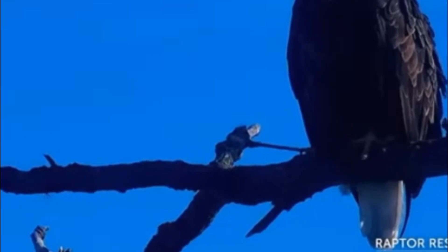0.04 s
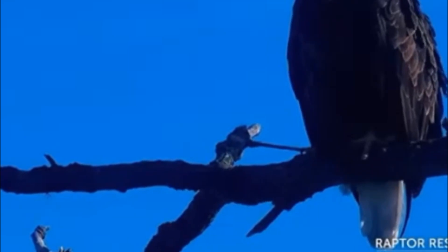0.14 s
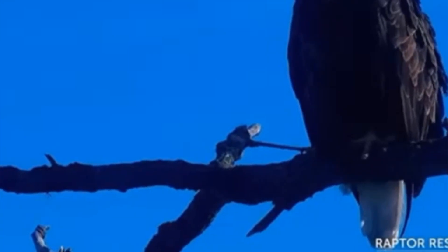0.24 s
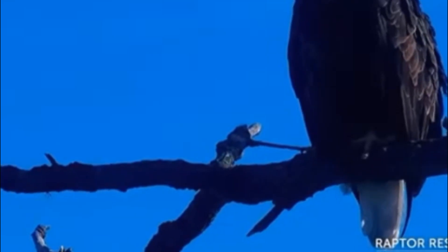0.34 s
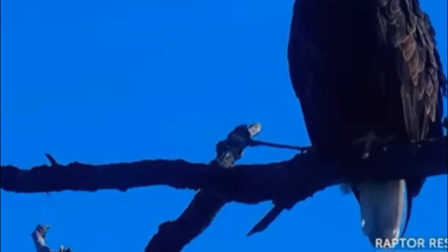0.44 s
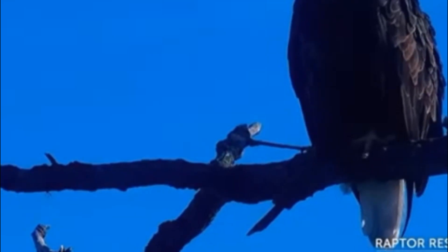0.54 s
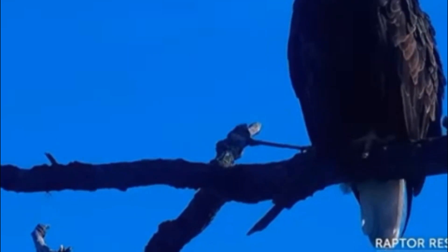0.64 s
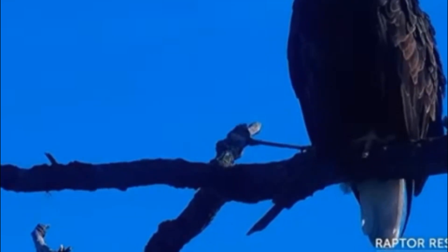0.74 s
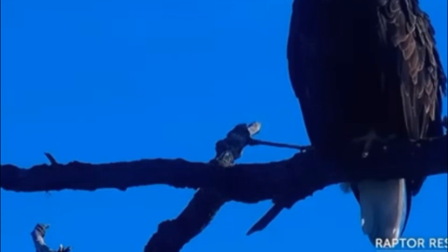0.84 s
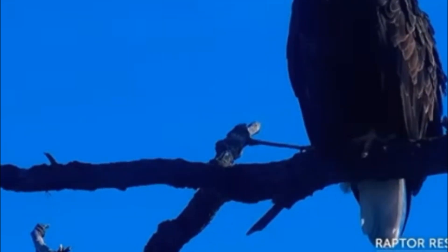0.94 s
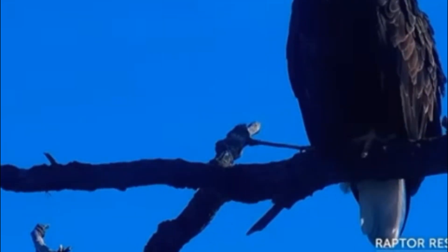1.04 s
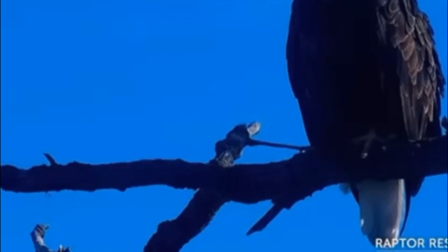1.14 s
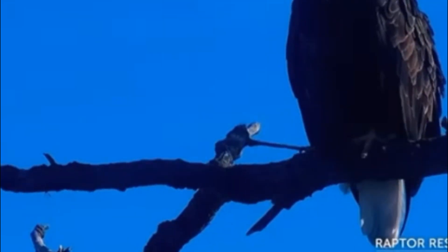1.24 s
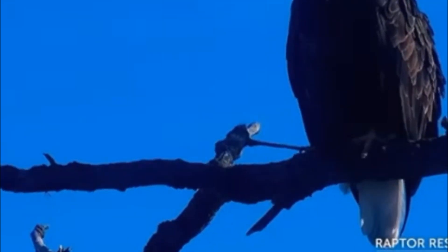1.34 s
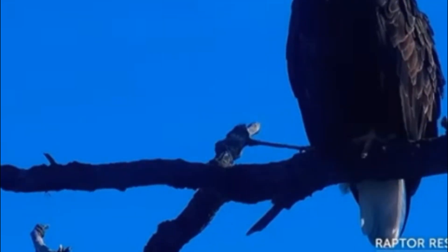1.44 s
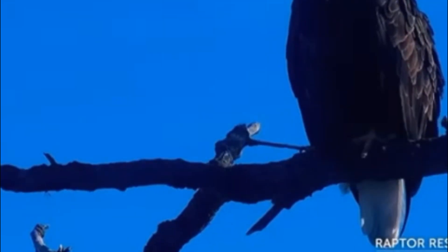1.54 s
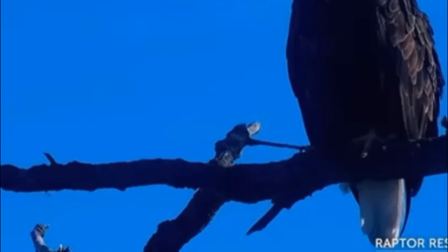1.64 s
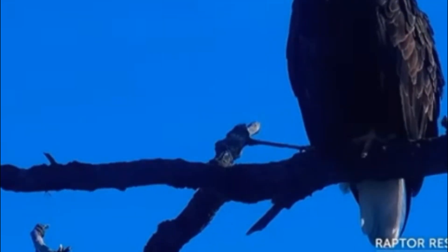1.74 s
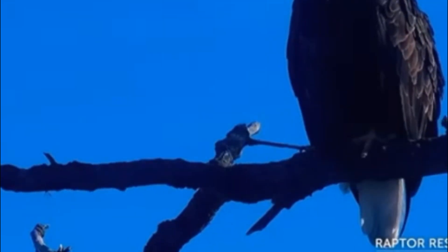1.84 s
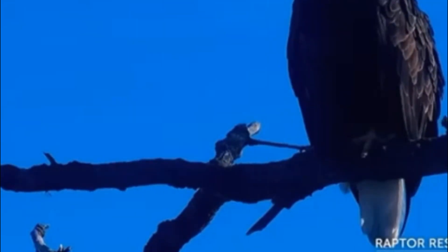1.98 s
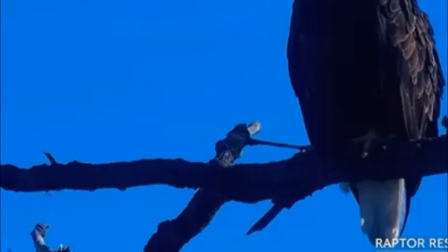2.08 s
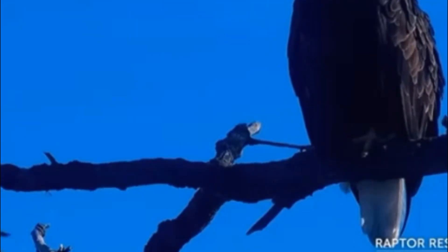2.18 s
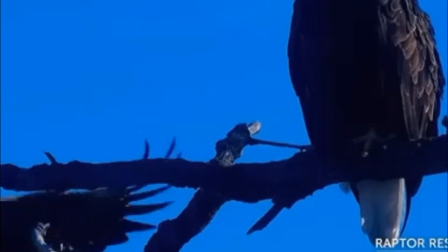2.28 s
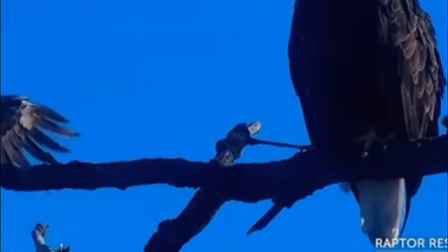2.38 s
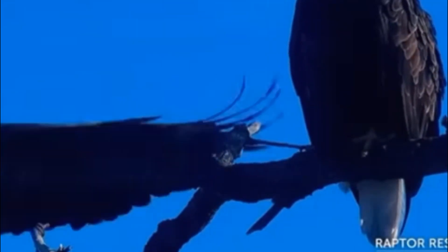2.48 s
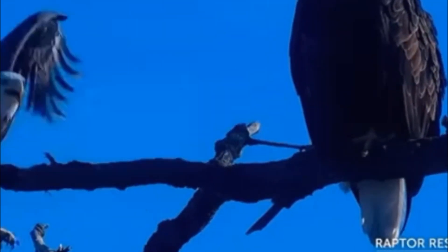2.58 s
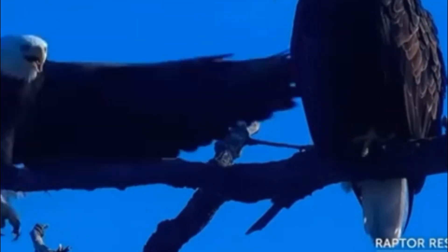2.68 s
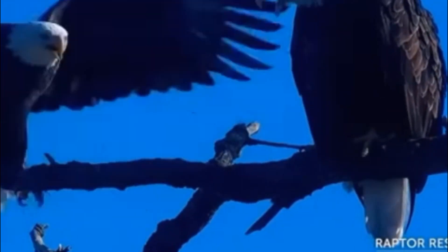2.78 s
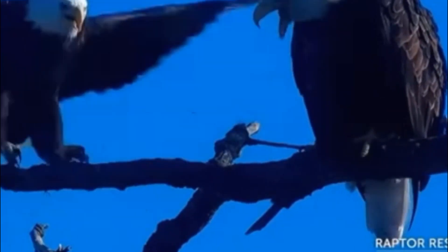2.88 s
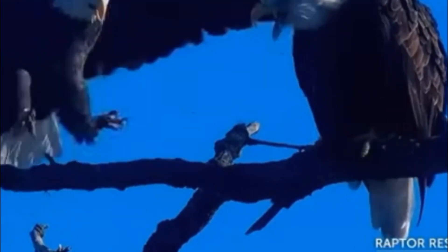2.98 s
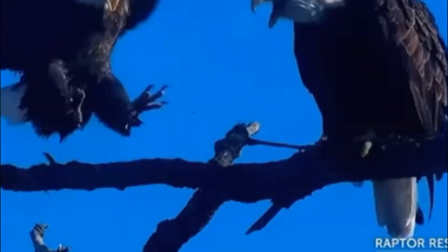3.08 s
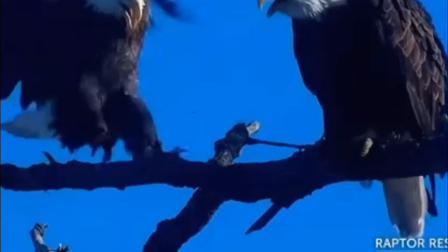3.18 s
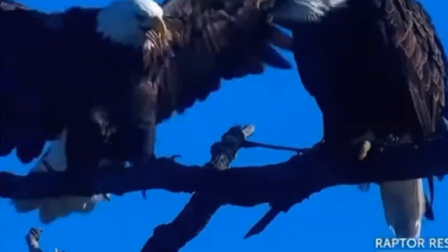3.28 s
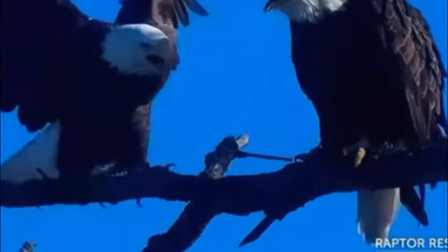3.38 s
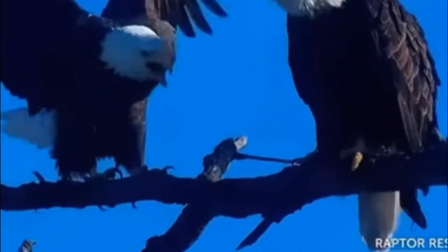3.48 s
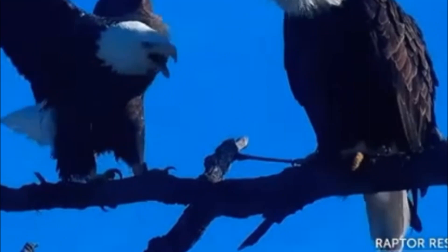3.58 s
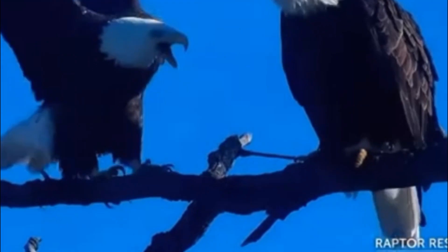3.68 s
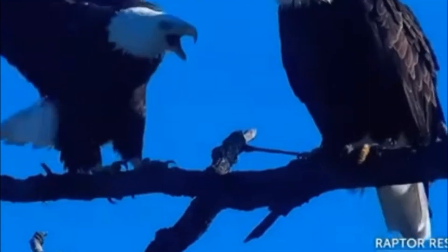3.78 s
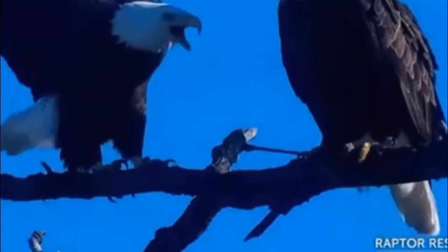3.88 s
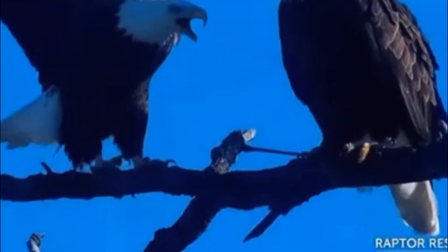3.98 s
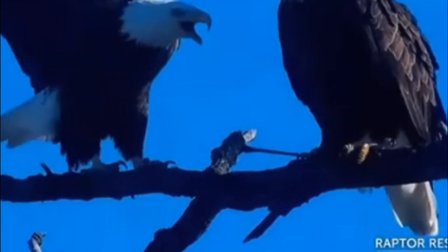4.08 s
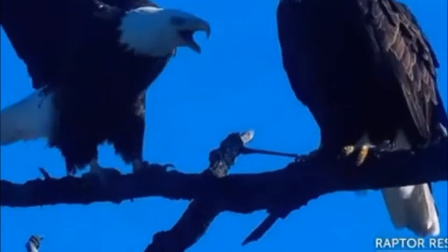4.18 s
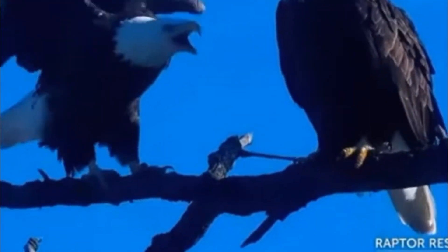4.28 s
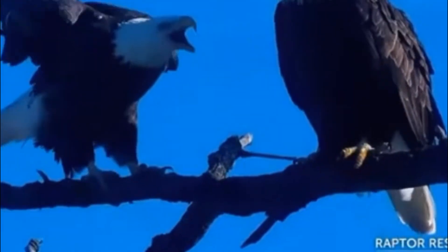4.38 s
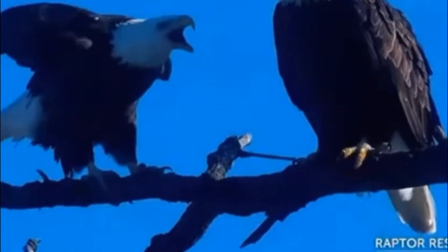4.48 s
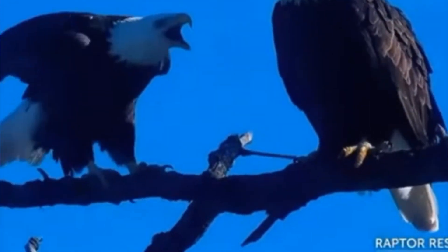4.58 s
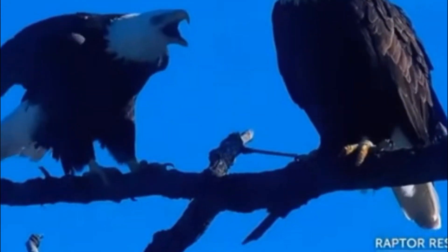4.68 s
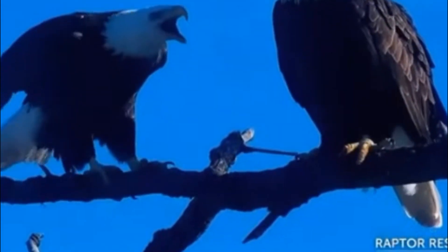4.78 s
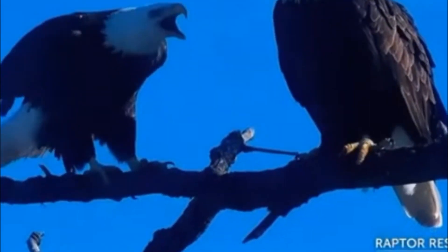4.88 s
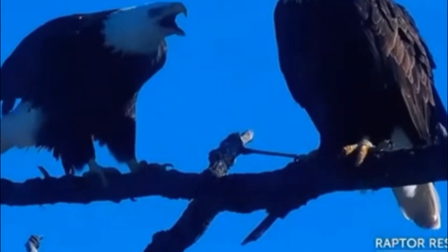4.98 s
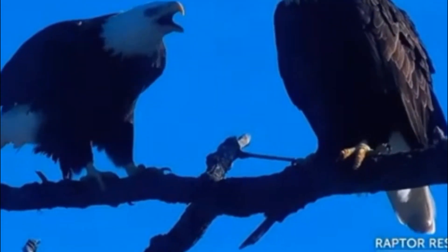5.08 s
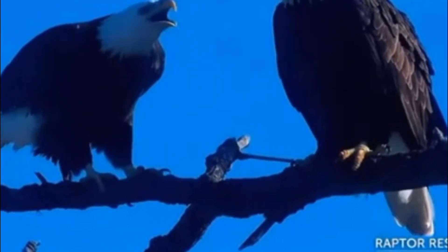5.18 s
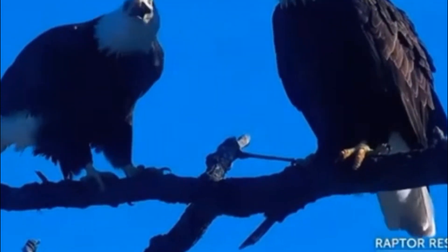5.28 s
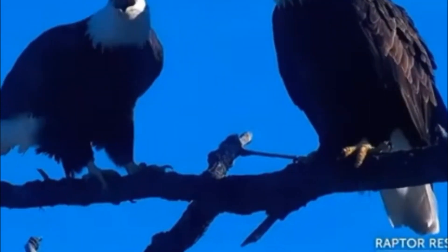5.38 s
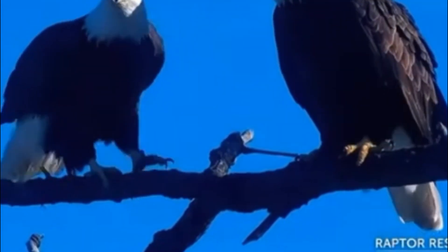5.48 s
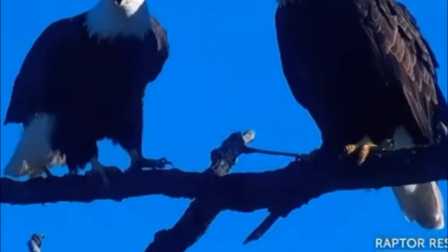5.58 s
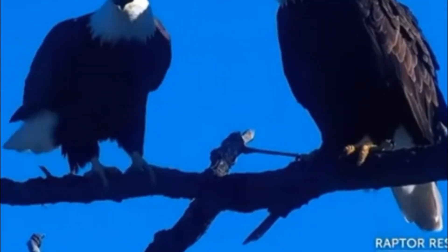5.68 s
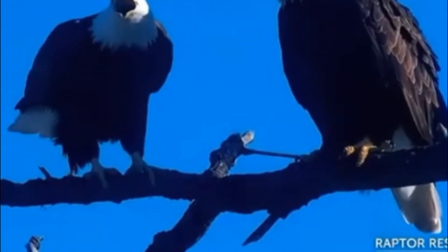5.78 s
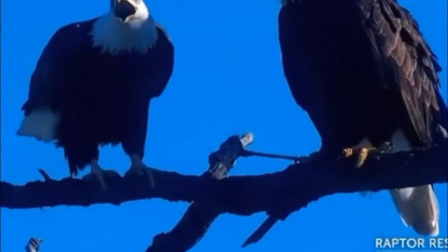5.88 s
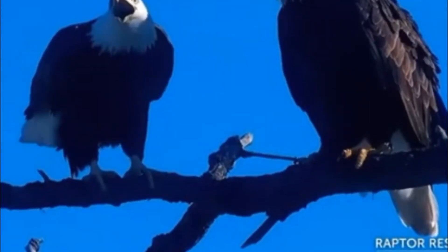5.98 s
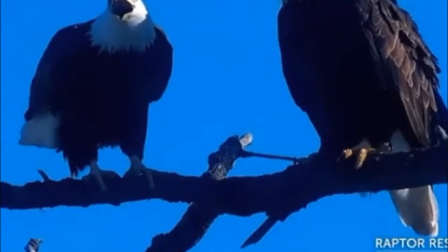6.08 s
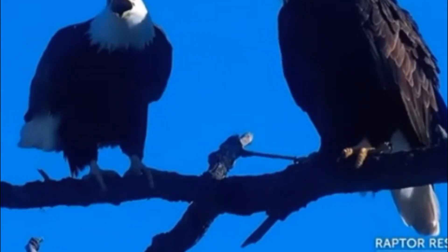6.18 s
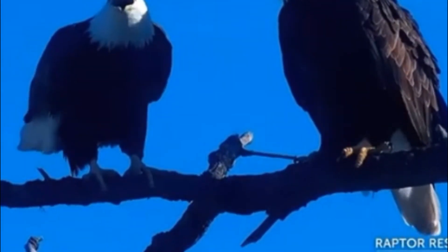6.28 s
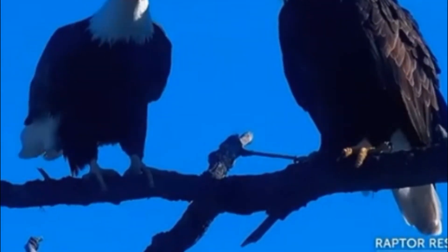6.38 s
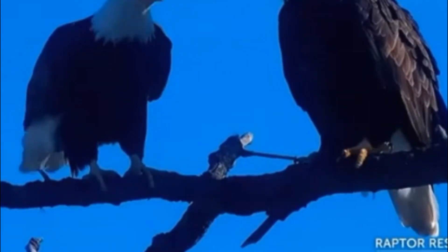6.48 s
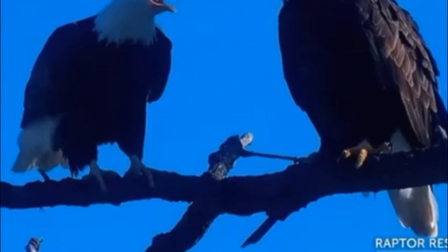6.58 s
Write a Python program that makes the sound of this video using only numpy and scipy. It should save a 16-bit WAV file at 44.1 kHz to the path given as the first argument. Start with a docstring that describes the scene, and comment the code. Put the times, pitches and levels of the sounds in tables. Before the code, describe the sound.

Over faint, steady wind and far-off water, two eagles begin with scattered clicks and brief high chitters. The calling then builds into an excited run of rapid squeaky notes, piping whistles and hoarse, breathy screeches, eases briefly, and returns in another flurry that ends on a few lower notes. The calls are clear, with a light open-air echo.

```python
"""Two eagles chittering

Beaks and throats click; the voices are gliding near-sines with overtones, roughened by unsteady airflow:
double-swelled chitter, squeaks, croaks, whistles and screeches, over rasping breath and bright air.
Trees and slopes return a scattered echo. Distant water and wind rush below, with faint hum and hiss.
The sound drops out once for a moment."""
import sys
import numpy as np
from scipy import signal
from scipy.fft import rfft, irfft, next_fast_len
from scipy.io import wavfile

SR = 44100
rng = np.random.default_rng(int(sys.argv[2]) if len(sys.argv) > 2 else 0)


def master(y):
    """Save y as 16-bit WAV."""
    cut = np.clip(np.atleast_2d(y).T, -1, 1)
    pcm = np.round(cut * 32767)  # scale
    wavfile.write(sys.argv[1], SR, pcm.astype(np.int16))


N = 292824


def from_db(db):
    """Decibels to gain."""
    return 10 ** (np.asarray(db) / 20)


def rms_one(x):
    """Scale to rms 1."""
    return x / np.sqrt(np.mean(x ** 2) + 1e-20)


def filtered(x, order, hz, kind):
    """Butterworth filter."""
    return signal.sosfilt(signal.butter(order, hz, kind, fs=SR, output="sos"), x)


def span(start_s, end_s):
    """Sample times of a stretch."""
    return np.arange(round(start_s * SR), round(end_s * SR)) / SR


def drift(rate_hz):
    """Random wander between knots of spread 1."""
    knots = rng.standard_normal(int(N / SR * rate_hz) + 2)
    return np.interp(np.arange(N) / SR * rate_hz, np.arange(len(knots)), knots)


def coloured(spectrum):
    """Noise of rms 1, shaped by rows of f/Hz, level/dB."""
    hz, db = np.transpose(spectrum)
    size = next_fast_len(N)
    bins_hz = np.maximum(np.arange(size // 2 + 1) * SR / size, 1)
    gain = from_db(np.interp(np.log(bins_hz), np.log(hz), db))
    return rms_one(irfft(rfft(rng.standard_normal(size)) * gain, size)[:N])


def swell(t_ms, rise_ms, fall_ms):
    """Rounded rise and fall, height 1 at time 0."""
    share = np.where(t_ms < 0, -t_ms / rise_ms, t_ms / fall_ms)
    return np.cos(np.pi / 2 * np.clip(share / 1.157, 0, 1)) ** .79


def bursts(rows, rise_db_per_s, floor_db):
    """Gain that climbs to each peak and fades to a floor."""
    t = np.arange(N) / SR
    peaks_db = [db + np.where(t < s, rise_db_per_s, -fade) * (t - s) for s, db, fade in rows]
    return from_db(np.maximum(np.max(peaks_db, axis=0), floor_db))


def short_note(peak_s, rise_ms, fall_ms, start_hz, peak_hz, end_hz, db, octave_db, hoarse_db):
    """Note for voice(): one swell gliding through three pitches."""
    t = span(peak_s - .03, peak_s + .03)
    t_ms = (t - peak_s) * 1000
    pitch_hz = np.interp(t_ms, [-rise_ms, 0, fall_ms], [start_hz, peak_hz, end_hz])
    return t, pitch_hz, from_db(db) * swell(t_ms, rise_ms, fall_ms), octave_db, hoarse_db


def long_note(curve, hoarse_db, edge_s=.002):
    """Note for voice(): follows a curve of pitch, level and octave overtone."""
    s, hz, db, octave_db = np.transpose(curve)
    t = span(s[0], s[-1])
    fade = np.clip(np.minimum(t - s[0], s[-1] - t) / edge_s, 0, 1)
    level = np.sqrt(2) * np.interp(t, s, from_db(db / 2)) ** 2 * fade
    full_effort_octave_db = np.interp(t, s, octave_db - 2 * db) + max(db)
    return t, np.interp(t, s, hz), level, full_effort_octave_db, hoarse_db


def water_and_wind(gust_db=1.63, hum_db=-72.5):
    """Distant rumble and brighter rush, each swaying a little, and a faint hum."""
    # t/s, rumble level/dB, rush level/dB
    levels = [(0.0, -58.5, -60), (0.57, -56.5, -59), (1.29, -59.5, -59.5), (1.64, -57.5, -61),
              (2.44, -60, -59.5), (2.79, -57.5, -60), (3.14, -58, -59), (3.44, -56, -58.5),
              (3.59, -55.5, -55.5), (3.86, -55.5, -56.5), (4.03, -57.5, -55.5), (4.48, -54.5, -57.5),
              (5.1, -55.5, -57), (5.44, -55.5, -58), (6.1, -54.5, -56), (6.31, -60, -55.5),
              (6.64, -60.5, -53.5)]
    # spectra: f/Hz, level/dB
    rumble_spectrum = [(20, -47.5), (60, -61), (100, -27.5), (160, -9.5), (215, 3), (270, 7.5), (350, 5),
                       (450, 2.5), (560, 1), (800, -44.5), (1500, -41.5)]
    rush_spectrum = [(450, -25.5), (650, 3), (800, 1), (1000, 3), (1320, 5.5), (1650, 0), (2100, -6.5),
                     (3200, -14.5), (5000, -22.5), (7000, -27.5), (8500, -52.5), (11000, -53)]
    hum_spectrum = [(850, -41), (960, -7.5), (1010, 0), (1060, -9.5), (1200, -40.5)]
    s, *columns = np.transpose(levels)
    rumble_db, rush_db = [np.interp(np.arange(N) / SR, s, db) for db in columns]
    rumble = from_db(rumble_db + gust_db * drift(6.2)) * coloured(rumble_spectrum)
    hum = from_db(hum_db + 3.3 * drift(1.5)) * coloured(hum_spectrum)
    rush = from_db(rush_db + gust_db * drift(6.3)) * coloured(rush_spectrum)
    return rumble + hum + rush


def clicks(rise_cycles=1.7, crack_db=-10):
    """A snap rings a few cycles in the throat, with a broad crack on top."""
    # beak and throat snaps: t/s, level before the band-pass/dB, f/Hz
    snaps = [(0.377, -46, 4080), (0.7262, -42, 3940), (0.7347, -46, 1710), (1.0016, -51, 2380),
             (1.016, -49, 2120), (1.0394, -51, 4050), (1.0605, -51, 3720), (1.072, -41, 3880),
             (1.516, -43.5, 3960), (1.8463, -47, 3080), (1.8547, -47, 2500), (1.8698, -38.5, 4040),
             (1.883, -32, 4150), (1.9854, -34, 4400), (2.03, -45, 4910), (2.0378, -34.5, 4050),
             (2.1321, -48, 3860), (2.2344, -54, 3850), (2.385, -48.5, 4320), (2.9222, -43, 4480),
             (2.9336, -48, 2060), (2.9434, -60, 1960), (3.027, -43, 1870), (3.2444, -49, 2930),
             (3.5516, -44, 3040), (3.56, -41, 3120), (3.9199, -29.5, 2960), (4.2804, -41.5, 2960),
             (4.4044, -41, 3440), (4.663, -41, 2720), (4.684, -40, 2890), (5.0424, -59, 3770),
             (5.0874, -41, 4280), (5.1364, -55, 4300), (5.1834, -23, 4180), (5.2779, -31, 4160),
             (5.8304, -48, 3160)]
    out = np.zeros(N)
    t = np.arange(300) / SR
    for s, db, hz in snaps:
        age = t * hz / rise_cycles
        envelope = from_db(db) * age * np.exp(1 - age)
        crack = from_db(crack_db) * rng.standard_normal(len(t))
        at = round(s * SR)
        out[at:at + len(t)] += envelope * (np.sin(2 * np.pi * hz * t) + crack)
    return filtered(out, 4, [1800, 6400], "band")


def chitter(plunge_ms=2.5, sweep_rise_ms=4, sweep_fall_ms=4.9, last_fall_ms=4.14, sag=.97):
    """Each note swells, sags and swells again; a strong lead-in sweeps down from above."""
    # first swell: t/s, f/Hz, level/dB, rise/ms; second swell: gap/ms, f/Hz, level/dB;
    # sweep level/dB, relative octave/dB, hoarseness/dB
    notes = [(1.1105, 4120, -42, 2, 9, 4100, -56, -68, -45, -18),
             (1.179, 3740, -36.5, 4.8, 18, 4000, -44, -45, -41, -15),
             (1.2123, 4150, -47, 3.8, 4.5, 4040, -44, -74, -38, -17),
             (1.2816, 3690, -39.5, 5.8, 14, 4040, -54, -50, -49, -14),
             (1.9518, 3904, -24.5, 6.2, 10.6, 4190, -23, -34.5, -37.5, -25.5),
             (2.0458, 3995, -19, 5.5, 11.2, 4120, -20.5, -36.5, -39, -23.5),
             (2.1431, 3920, -27.5, 4.3, 14.8, 3890, -33, -51, -38, -19),
             (2.2607, 3680, -41, 8, 8.9, 3920, -58, -62, -45, -18),
             (3.02, 3730, -38, 3, 6.5, 3930, -58, -57, -29.5, -13),
             (3.122, 3800, -32, 3.5, 5.3, 3650, -36.5, -65, -25.5, -17),
             (3.6782, 3960, -35.5, 4, 8.7, 3850, -50, -62.5, -36, -25.5),
             (4.1475, 4210, -23, 3.7, 18, 4160, -24.5, -38, -48, -16.5),
             (4.244, 4194, -20.5, 7.6, 10.2, 4400, -29, -46, -44, -18.5),
             (4.3364, 4010, -28.5, 6.3, 7.6, 3950, -45, -49, -53.5, -14),
             (5.0071, 3962, -18, 3.1, 10.6, 4350, -33, -70, -40, -27.5),
             (5.1047, 4400, -24, 2.9, 9, 3850, -30.5, -55, -52, -19),
             (5.191, 4050, -21.5, 8, 15, 4214, -19.5, -35, -38, -19),
             (5.294, 3924, -23, 10, 13.8, 4150, -32, -36, -35.5, -21),
             (5.7765, 3160, -30, 5.5, 10.7, 3150, -34.5, -70, -30, -31),
             (5.814, 3800, -40.5, 2.9, 9.3, 3670, -51, -44, -34, -18),
             (5.8764, 3190, -34, 6.1, 12, 3170, -38, -69, -26.5, -34),
             (5.887, 4020, -44, 3.4, 18.5, 3900, -44, -43, -41, -10),
             (5.95, 3950, -24.5, 5.1, 12, 4280, -29, -32, -32, -36.5),
             (6.0596, 4180, -26.5, 4.9, 7.5, 3920, -29, -46, -48, -9),
             (6.1382, 3830, -36, 3.7, 8, 3800, -57, -63, -43, -20)]
    for s, hz, db, rise_ms, gap_ms, next_hz, next_db, sweep_db, octave_db, hoarse_db in notes:
        t = span(s - .024, s + .04)
        t_ms = (t - s) * 1000
        sweep_at_ms = -max(8.8, rise_ms + 1)
        plunge_at_ms = sweep_at_ms - sweep_rise_ms
        fall_ms = .35 * gap_ms
        lead_ratios = [1.8, 1.2, 1.13, 1.04] if sweep_db > db - 25 else [sag] * 4
        knots_ms = [plunge_at_ms - plunge_ms, plunge_at_ms, sweep_at_ms, -rise_ms,
                    0, fall_ms, gap_ms, gap_ms + last_fall_ms]
        knots_hz = [*np.multiply(lead_ratios, hz), hz, sag * hz, next_hz, sag * next_hz]
        level = (from_db(sweep_db - 17) * swell(t_ms - plunge_at_ms, plunge_ms, plunge_ms)
                 + from_db(sweep_db) * swell(t_ms - sweep_at_ms, sweep_rise_ms, sweep_fall_ms)
                 + from_db(db) * swell(t_ms, rise_ms, fall_ms)
                 + from_db(next_db) * swell(t_ms - gap_ms, .34 * gap_ms, last_fall_ms))
        yield t, np.interp(t_ms, knots_ms, knots_hz), level, octave_db, hoarse_db


def voice(notes, waver=.0025, thinning_db_per_octave=-30, grit_db=-12):
    """Notes sound as near-sines whose overtones grow with effort; hoarseness adds noise."""
    # scratch under hoarse swells: f/Hz, level/dB
    grit_spectrum = [(800, -44.5), (1500, 0), (2300, 29), (3300, -4), (5500, -35), (7500, -24),
                     (11000, -46.5)]
    wobble = 1 + waver * drift(300)
    flutter = rms_one(filtered(rng.standard_normal(N), 3, 1200, "low"))   # unsteady airflow
    jitter = rms_one(filtered(rng.standard_normal(N), 3, [150, 900], "band"))   # cycle timing slips
    grit = rms_one(coloured(grit_spectrum) * from_db(12 * drift(500)))
    out = np.zeros(N)
    for t, pitch_hz, level, octave_db, hoarse_db in notes:
        at = np.round(t * SR).astype(int)
        hz = pitch_hz * wobble[at]
        hoarse = from_db(hoarse_db)
        effort = level / level.max()
        phase = 2 * np.pi * np.cumsum(hz) / SR + 1.6 * hoarse * jitter[at]
        # high notes and pure notes keep weaker upper overtones
        thin_db = thinning_db_per_octave * np.maximum(np.log2(pitch_hz / 3000), 0)
        thin_db += .3 * (np.clip(np.median(octave_db), -45, -25) + 30)
        tone = np.sin(phase)
        for k, overtone_db in (2, octave_db), (3, thin_db - 44), (4, thin_db - 52):
            audible = k * hz < SR / 2.5
            tone += audible * effort * from_db(overtone_db) * np.sin(k * phase)
        rough_tone = tone * (1 + hoarse * flutter[at])
        out[at] += level * (rough_tone + hoarse * from_db(grit_db) * grit[at])
    return out


def squeaks():
    """Single brief glides between the notes."""
    # peak t/s, rise/ms, fall/ms, start f/Hz, peak f/Hz, end f/Hz, level/dB
    notes = [(1.317, 1.7, 3.3, 3500, 3920, 3600, -45.5), (1.908, 4.5, 2.6, 5000, 5800, 7440, -61),
             (2.085, 6, 5, 4340, 4850, 4950, -48), (2.1698, 4.2, 4.4, 4030, 3940, 3970, -44),
             (3.128, 4.7, 2.6, 2930, 2990, 2930, -36.5), (3.359, 8.4, 6.4, 4060, 5050, 3820, -40.5),
             (3.457, 4.4, 6.1, 4000, 5200, 3900, -42), (3.535, 4, 27, 6140, 6280, 6040, -45.5),
             (3.6842, 3.9, 17, 3180, 3210, 3520, -49), (3.75, 3.8, 8.7, 3870, 4160, 3800, -41.5),
             (3.8927, 3.8, 6.7, 5170, 4660, 5000, -42.5), (4.1145, 1.2, 1.7, 4060, 4000, 4260, -36.5),
             (4.119, 3.3, 4, 4440, 5400, 6450, -57.5), (4.2976, 2.3, 4.1, 3190, 2930, 3000, -43),
             (4.5725, 4.4, 7.8, 3690, 3790, 3630, -31), (4.5936, 12, 5.7, 3720, 3770, 4070, -38),
             (4.617, 4.5, 2.1, 4560, 4270, 4690, -40), (4.602, 4.5, 4.7, 4430, 6020, 3800, -40),
             (4.638, 4.1, 9, 7300, 6720, 7040, -42.5), (4.6424, 2.3, 2.1, 4800, 4530, 4540, -39.5),
             (4.6604, 1.4, 3.5, 3900, 3600, 4050, -38), (4.6654, 6.3, 4.6, 2700, 2780, 2650, -38),
             (4.9885, 5.5, 11.4, 3340, 4055, 3970, -29), (5.045, 4.7, 2.8, 3730, 4550, 6300, -34.5),
             (5.081, 2, 5.2, 7500, 6840, 6100, -44.5), (5.088, 5.9, 2.4, 6340, 4700, 4800, -35.5),
             (5.096, 2.5, 1.5, 4930, 5030, 5050, -28.5), (5.096, 12.5, 2.5, 4440, 4280, 4600, -34),
             (5.213, 4.6, 5.5, 3440, 3420, 3130, -47), (5.119, 4.4, 5.5, 3530, 4200, 3620, -36),
             (5.7998, 3.3, 6.1, 5120, 4780, 4400, -44), (6.026, 2.7, 3, 5830, 4660, 3540, -34),
             (5.305, 5.5, 5, 3260, 3400, 3250, -42), (5.866, 6, 4, 7200, 6400, 4250, -55.5),
             (5.7539, 15, 8.3, 2780, 2900, 2930, -50), (5.763, 7.9, 5, 3580, 4830, 3750, -38.5),
             (5.7887, 8.5, 4.7, 4770, 4740, 4960, -41), (5.918, 8, 4.3, 3900, 3050, 2760, -47),
             (5.9308, 8, 2.7, 3680, 4540, 4650, -30), (5.939, 7, 2, 4760, 4810, 4480, -28),
             (5.948, 5, 3.6, 4690, 4894, 4850, -25.5), (5.9624, 5.8, 3.5, 4850, 4830, 4780, -30),
             (5.9699, 3.4, 3.2, 4950, 5180, 5600, -34.5), (6.0364, 2.4, 4.6, 5700, 4900, 5100, -33),
             (6.0411, 2.8, 8.8, 6350, 6080, 5940, -34.5), (6.187, 5, 15, 4360, 3720, 3600, -41)]
    return [short_note(*note, octave_db=-36, hoarse_db=-20.5) for note in notes]


def rasp(slips_per_s=500, ring_cycles=11, breath_db=-4):
    """The voice breaks into tiny squeaks of scattered pitch over turbulent breath."""
    # hoarse breaths: peak t/s, level/dB, fade/(dB/s)
    breaths = [(1.86, -58.5, 33), (2.93, -66.5, 29), (3.35, -54, 20), (3.44, -47.5, 250),
               (3.55, -45, 199.5), (3.75, -49.5, 201.5), (3.9, -43, 449.5), (4.13, -46, 278),
               (4.27, -42, 177), (4.52, -57, 69), (4.63, -54, 100), (4.69, -46, 900), (5.0, -62, 68),
               (5.2, -70, 79), (5.1, -60, 200), (5.36, -60, 160), (5.85, -56.5, 79), (5.96, -48.5, 110.5),
               (6.18, -72, 46.5)]
    # squeaks and breath: f/Hz, level/dB
    spectrum = [(500, -64.5), (900, -13), (1600, 10), (2500, 10.5), (4000, 8), (6500, -9), (8000, -37),
                (11000, -47), (15500, -26.5)]
    hz, db = np.transpose(spectrum)
    pitches_hz = np.geomspace(1500, 7500, 16)
    slips = (rng.random(N) < slips_per_s / SR) * rng.standard_normal(N) + 1e-18
    pitch_index = rng.integers(0, len(pitches_hz), N)
    grains = np.zeros(N)
    for k, pitch_hz in enumerate(pitches_hz):
        radius = from_db(-60 * pitch_hz / ring_cycles / SR)
        poles = [1, -2 * radius * np.cos(2 * np.pi * pitch_hz / SR), radius ** 2]
        ring = signal.lfilter([1], poles, slips * (pitch_index == k))
        rounded = signal.lfilter([1, 0, -1], poles, ring)   # second pass softens the onset
        gain = from_db(np.interp(np.log(pitch_hz), np.log(hz), db)) * np.sqrt(pitch_hz)
        grains += gain * rms_one(rounded)
    breath = coloured(spectrum) * from_db(3 * drift(300))
    texture = rms_one(rms_one(grains) + from_db(breath_db) * rms_one(breath))
    return bursts(breaths, rise_db_per_s=329.5, floor_db=-74.5) * texture


def croaks(start_ratio=.91):
    """Low notes with a strong octave slide up to their pitch."""
    # peak t/s, rise/ms, fall/ms, f/Hz, level/dB
    notes = [(1.8817, 1.8, 2.8, 2490, -42.5), (3.3479, 8, 2.4, 1975, -30), (3.4692, 2.6, 6, 1990, -47.5),
             (3.5689, 5, 2.7, 2100, -47), (3.756, 8.6, 5.7, 1342, -45.5), (3.758, 9.5, 1.3, 2105, -38.5),
             (4.13, 7.6, 8.2, 1309, -42.5), (4.2997, 4.5, 1.7, 1800, -43), (4.5241, 4.7, 4.9, 1825, -30.5),
             (4.626, 7.8, 9.1, 1872, -41), (4.687, 9.5, 5.5, 1750, -44.5), (5.0877, 8, 2.8, 2080, -41.5),
             (6.0119, 12, 5.6, 1983, -38), (6.018, 5.9, 5.4, 1970, -35), (6.193, 5.7, 5.2, 2416, -37),
             (6.4364, 7.3, 9.1, 2200, -48), (6.507, 5.9, 5, 1550, -44.5)]
    for s, rise_ms, fall_ms, hz, db in notes:
        yield short_note(s, rise_ms, fall_ms, start_ratio * hz, hz, hz, db,
                         octave_db=-9.5, hoarse_db=-23.5)


def bright_air():
    """Air rushes out at the height of the calls: grainy hiss far above the voice."""
    # peak t/s, level/dB, fade/(dB/s)
    puffs = [(3.325, -72.5, 302.5), (3.54, -70, 450), (3.9, -70.5, 600), (4.27, -77, 480), (4.62, -78, 300),
             (5.945, -73, 61), (6.0, -75.5, 60), (6.05, -70, 700)]
    hiss = filtered(rng.standard_normal(N), 4, 8000, "high")
    grainy = rms_one(hiss * from_db(3 * drift(360)))
    return bursts(puffs, rise_db_per_s=449, floor_db=-110) * grainy


def whistles():
    """Longer, nearly pure gliding notes."""
    # one curve per whistle: t/s, f/Hz, rms level/dB, octave rms level/dB
    curves = [
        [(3.369, 3020, -48, -74.5), (3.375, 2950, -20.5, -49.5), (3.381, 3060, -25, -53),
         (3.385, 3084, -36, -65.5), (3.391, 3080, -19, -52.5), (3.397, 3066, -27, -50.5),
         (3.405, 3010, -53.5, -60.5), (3.409, 3063, -45, -77), (3.413, 3160, -31.5, -62.5),
         (3.419, 3110, -32.5, -65.5), (3.431, 2930, -54.5, -89.5), (3.439, 3040, -46.5, -68.5),
         (3.455, 3100, -49.5, -84)],
        [(3.741, 2560, -47, -76.5), (3.757, 2900, -28.5, -67.5), (3.765, 2932, -23, -59),
         (3.779, 3020, -18.5, -47), (3.789, 3092, -31.5, -58.5), (3.805, 3084, -26.5, -46.5),
         (3.815, 2976, -28, -62.5), (3.827, 2955, -22.5, -52.5), (3.837, 2865, -26, -78),
         (3.843, 2900, -42, -64)],
        [(3.497, 3110, -64.5, -69.5), (3.503, 3010, -50, -58), (3.513, 2960, -43.5, -81),
         (3.527, 3050, -48, -69.5), (3.533, 2960, -65, -60.5), (3.543, 3140, -43, -67), (3.563, 3085, -51, -72),
         (3.571, 3130, -51, -94), (3.573, 3091, -55.5, -85.5)],
        [(3.894, 3170, -40.5, -61), (3.896, 3230, -31.5, -62), (3.902, 3213, -27.5, -47.5),
         (3.908, 3080, -37, -57), (3.914, 3045, -48.5, -76), (3.92, 3025, -42, -70), (3.936, 3100, -42, -75.5),
         (3.94, 3047, -49, -86.5)],
        [(4.124, 2500, -46.5, -86.5), (4.128, 2500, -45, -69), (4.136, 2833, -32, -59), (4.146, 2815, -19, -51),
         (4.164, 3006, -20, -43), (4.17, 3060, -25.5, -52), (4.178, 3172, -44.5, -79)],
        [(4.33, 3460, -53.5, -86), (4.334, 3380, -41, -70.5), (4.34, 3336, -29, -53), (4.346, 3400, -42, -81),
         (4.348, 3300, -45, -99.5), (4.35, 3240, -36, -83), (4.362, 3260, -48, -76)],
        [(4.525, 2745, -34.5, -60), (4.535, 2724, -22, -44), (4.547, 2900, -20.5, -51),
         (4.553, 2980, -21.5, -43.5), (4.56, 3190, -36, -59.5)],
        [(5.968, 2996, -40, -75.5), (5.97, 2960, -39, -84), (5.972, 2970, -25.5, -71),
         (5.978, 3078, -21.5, -55), (5.986, 3017, -28, -59), (5.992, 3004, -38, -77), (5.998, 2950, -22, -57),
         (6.004, 2910, -30.5, -57), (6.015, 2940, -44, -70)],
        [(6.076, 2935, -43, -68), (6.082, 2937, -25.5, -62), (6.088, 2964, -25.5, -52.5),
         (6.104, 2891, -27, -67), (6.116, 2846, -32, -84.5), (6.122, 2871, -37, -83), (6.124, 2868, -40, -97)],
        [(6.189, 2910, -44, -92), (6.197, 2902, -26, -74), (6.205, 2867, -24.5, -70), (6.213, 2817, -30.5, -85),
         (6.221, 2900, -39, -72), (6.226, 2950, -42, -69)],
        [(5.668, 2850, -65, -119), (5.68, 2980, -47.5, -84), (5.702, 3670, -47.5, -60),
         (5.712, 3595, -42.5, -55.5), (5.722, 3520, -64.5, -87.5), (5.73, 3490, -49.5, -57),
         (5.74, 3800, -55, -54), (5.756, 4100, -68, -85)],
        [(6.298, 2256, -44, -65), (6.306, 2288, -28, -44.5), (6.316, 2214, -29, -45), (6.324, 2290, -48, -63)],
        [(6.403, 2140, -58, -88), (6.411, 2040, -40, -62), (6.419, 2070, -34, -45), (6.425, 2093, -33, -56),
         (6.432, 2240, -51, -78)],
    ]
    return [long_note(curve, hoarse_db=-31.5) for curve in curves]


def screeches(snap_s=.0045, from_hz=4100, to_hz=4300, snap_loss_db=1):
    """The voice snaps up, glides high and snaps down."""
    # one curve per screech: t/s, f/Hz, rms level/dB, octave rms level/dB
    curves = [
        [(3.47, 6327, -62, -103), (3.486, 6500, -59, -75), (3.5, 6731, -57, -79), (3.504, 6721, -67, -89),
         (3.516, 6841, -60, -70), (3.524, 6840, -63.5, -108), (3.528, 6600, -51.5, -92),
         (3.533, 6600, -55, -98)],
        [(3.846, 6120, -55, -91.5), (3.852, 6125, -50, -90), (3.868, 6190, -52, -99.5), (3.874, 6280, -51, -78),
         (3.88, 6340, -53, -73.5), (3.886, 6370, -37.5, -92), (3.89, 6100, -49, -111)],
        [(4.223, 6470, -49, -87), (4.229, 6588, -51, -76.5), (4.245, 6690, -55, -72), (4.251, 7000, -55, -88),
         (4.255, 7140, -56, -84), (4.263, 6640, -42, -91), (4.267, 6430, -45, -101)],
        [(4.617, 7300, -54, -101), (4.623, 6918, -43.5, -101), (4.635, 6360, -44, -104)],
        [(5.968, 5300, -49, -88), (5.974, 5660, -46.5, -95), (5.98, 6392, -35, -76), (5.986, 6657, -37.5, -72),
         (5.994, 7340, -41, -92), (6.01, 7540, -42.5, -74), (6.018, 7288, -41, -92), (6.026, 6450, -36.5, -87)],
    ]
    # per screech: hoarseness/dB
    hoarseness_db = [-20, -26, -22, -22, -14]
    for curve, hoarse_db in zip(curves, hoarseness_db):
        first, last = curve[0], curve[-1]
        onset = (first[0] - snap_s, from_hz, *np.subtract(first[2:], snap_loss_db))
        release = (last[0] + snap_s, to_hz, *np.subtract(last[2:], snap_loss_db))
        yield long_note([onset, *curve, release], hoarse_db)


def echo(x, length_s=.6, clump_db=4.5):
    """Countless small reflections from trees and slopes arrive in clumps."""
    # reflection envelope: delay/s, level/dB
    decay = [(.0015, -51), (.006, -36.5), (0.011, -47), (.03, -51.5), (.07, -65.5), (.1, -63.5),
             (.13, -60.5), (0.168, -65), (.25, -75.5), (.35, -83.5), (.6, -96.5)]
    # beaks point away, so the echo is bright up to where air dulls it: f/Hz, level/dB
    spectrum = [(1000, 4), (3000, 4.5), (4200, 2.5), (6000, 6), (7000, 5), (8500, 0), (12000, -30)]
    s, db = np.transpose(decay)
    t = span(0, length_s)
    envelope = from_db(np.interp(t, s, db, left=-120) + clump_db * drift(90)[:len(t)])
    return signal.fftconvolve(x, envelope * coloured(spectrum)[:len(t)])[:N]


def scene():
    """Eagles, their echo, water and wind."""
    notes = [*chitter(), *squeaks(), *croaks(), *whistles(), *screeches()]
    eagles = voice(notes) + clicks() + rasp() + bright_air()
    return (eagles + echo(eagles) + water_and_wind())[None]


def record(dry, hiss_db=-80, low_cut_hz=64, dropout_db=-25, high_cut_hz=15650):
    """Steady hiss; the microphone loses deep bass; one brief dropout; the top is cut off."""
    hiss = from_db(hiss_db) * rng.standard_normal(N)
    thinned = filtered(dry + hiss, 2, low_cut_hz, "high")
    dropout_s = (2.318, 2.322, 2.341, 2.352)
    dip_db = np.interp(np.arange(N) / SR, dropout_s, [0, dropout_db, dropout_db, 0])
    low_pass = signal.ellip(10, .5, 60, high_cut_hz, fs=SR, output="sos")
    return signal.sosfilt(low_pass, thinned * from_db(dip_db))


dry = scene()
out = record(dry)
master(out)
```